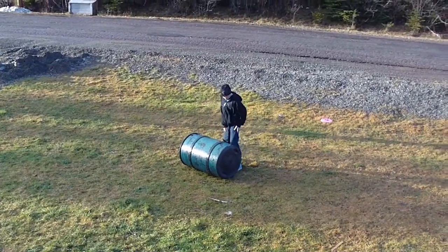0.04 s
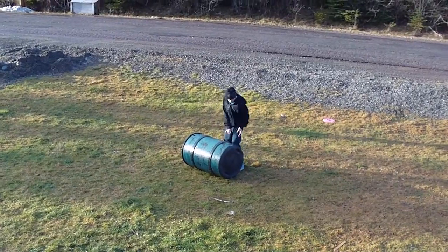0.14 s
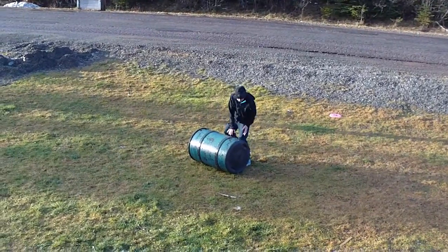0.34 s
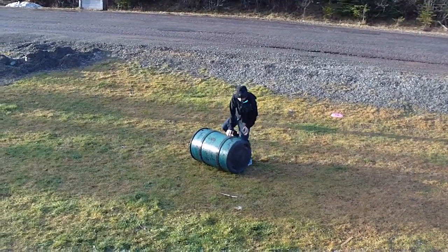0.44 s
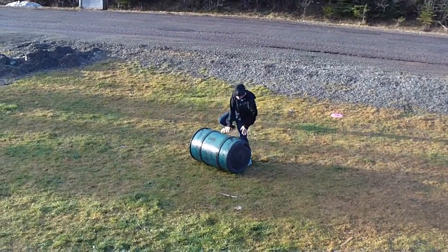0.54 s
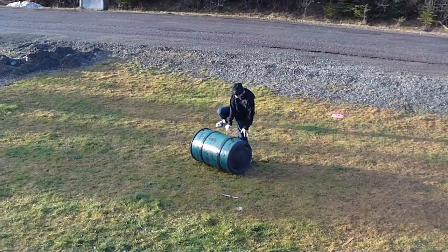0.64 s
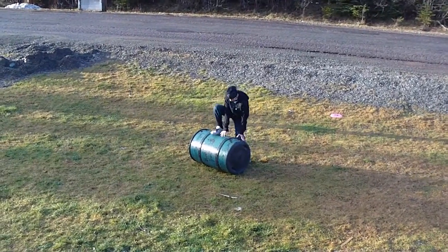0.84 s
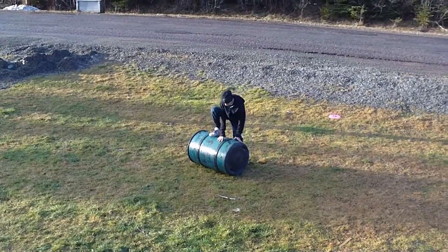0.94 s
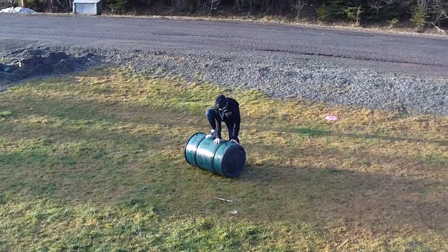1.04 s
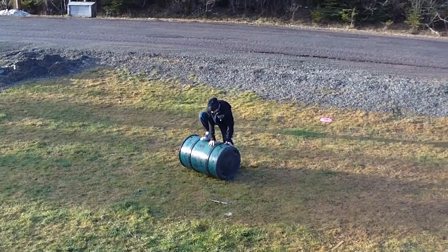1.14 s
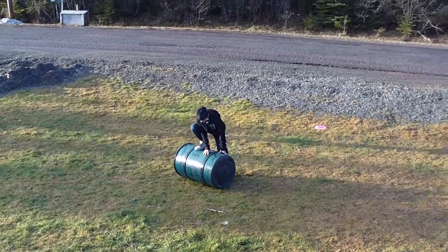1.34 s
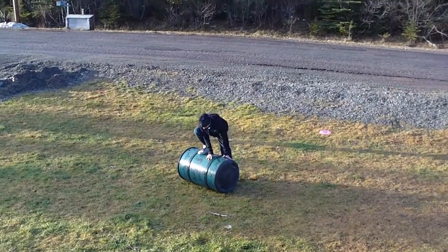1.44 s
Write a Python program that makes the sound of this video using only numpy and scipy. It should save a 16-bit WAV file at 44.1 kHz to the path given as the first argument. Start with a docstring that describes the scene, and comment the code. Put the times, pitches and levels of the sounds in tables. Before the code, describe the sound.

A small close click, then a dull, hollow footstep on a barrel over faint wind.

```python
"""A lawn in light wind: rumble, rush and faint hiss throughout, a few tiny rustling ticks at first.
At 0.24 s something small and hard clicks close to the microphone, rings and rattles for a moment.
At 0.38 s a soft bump sounds the hollow modes of a barrel lying in the grass.
At 0.8 s a foot comes down on it: a slap of the sole and a dull, hollow thump.
One more tiny tick follows as the barrel dies away."""
import sys
import numpy as np
from scipy import signal
from scipy.fft import rfft, irfft, next_fast_len
from scipy.io import wavfile
from scipy.ndimage import map_coordinates

SR = 44100
rng = np.random.default_rng(int(sys.argv[2]) if len(sys.argv) > 2 else 0)


def output_pcm(signal):
    """Save a mono or channel-first signal as 16-bit PCM at the path in sys.argv[1].

    Samples are clipped to [-1, 1] before scaling.
    """
    pcm = np.clip(np.atleast_2d(signal).T, -1, 1) * 32767
    wavfile.write(sys.argv[1], SR, np.round(pcm).astype(np.int16))


N = 66150

# wind spectra (frequency [Hz], relative density [dB])
RUMBLE_SPECTRUM = [(12, -5.5), (28, 1.5), (70, -5), (110, -8), (200, -14.5), (400, -40.5), (1500, -67)]
RUSH_SPECTRUM = [(100, -20), (250, -8.5), (380, -3), (500, -1), (700, -5), (900, -2.5), (1200, -12.5),
                 (1750, -14), (2200, -27.5), (4000, -29), (16000, -51)]
HISS_SPECTRUM = [(500, -24), (2000, 0), (3200, -1), (4600, -0.5), (6000, -3.5), (7200, -3.5), (8300, 2),
                 (10000, -4.5), (12500, -12.5), (15000, -26)]
# wind envelopes (time [s], level [dB])
RUSH_ENVELOPE = [(0, -52), (.08, -52), (.2, -58), (.32, -56), (.41, -50.5), (.438, -47), (.49, -50.5),
                 (.57, -51.5), (.69, -51.5), (.79, -48), (.9, -42.5), (.96, -47), (1.02, -45),
                 (1.07, -44.5), (1.115, -42), (1.17, -51), (1.33, -53), (1.5, -49.5)]
HISS_ENVELOPE = [(0, -70), (.06, -63), (.1, -61), (.19, -63.5), (.23, -54), (.28, -58), (.31, -64),
                 (.42, -61), (.49, -59), (.55, -66), (.7, -63.5), (.85, -63.5), (1.06, -63), (1.2, -55.5),
                 (1.31, -62), (1.42, -61), (1.5, -54)]
# rustling ticks (time [s], level [dB])
RUSTLE_TICKS = [(.061, -50), (.085, -50), (0.103, -45), (1.194, -47)]
# contacts of the small hard part (time [s], gain [dB], low-pass cut-off [Hz])
PART_CONTACTS = [(0.2184, -1.5, 760), (.2252, -27, 2250), (.2362, -13, 746), (0.2422, 3, 18000),
                 (0.2455, -13.5, 6000), (.2655, -23, 1500), (0.2717, -9.5, 810), (.2777, -24.5, 2600)]
# modes of the small hard part (frequency [Hz], level [dB], t60 [s])
PART_MODES = [(140, -38, 0.025), (401, -32.5, 0.056), (510, -24, 0.013), (795, -22.5, 0.03),
              (1293, -21.5, 0.027), (1514, -20.5, 0.018), (1915, -16.5, 0.019), (2825, -12.5, 0.0076),
              (3234, -19, 0.0094), (4076, -16.5, 0.012), (4500, -17, 0.007), (5040, -13.5, 0.0098),
              (5600, -16.5, 0.0077), (7530, -9, 0.0039), (8590, -21.5, 0.0096), (14900, -36, .005)]
# modes of the barrel (frequency [Hz], level [dB], t60 [s])
HOLLOW_MODES = [(46.3, -30, 0.36), (71.9, -28.5, 0.36), (109, -29.5, 0.26), (152.6, -33.5, 0.54),
                (166.4, -37, 0.41), (230, -35.5, 0.16), (334, -25, 0.11), (389, -35.5, 0.18),
                (423.7, -37.5, 0.44), (448, -37.5, 0.26), (491, -35, 0.22), (677, -34.5, 0.097),
                (928, -36, 0.098)]
# noise bursts of the blow: push, shell, slap, scuff, tick of the sole
# (low edge [Hz], high edge [Hz], level [dB], attack [s], t60 [s])
FOOT_BURSTS = [(55, 234, -43, 0.0025, 0.098), (246, 1090, -29, 0.0056, 0.15),
               (930, 1670, -29.5, 0.0018, 0.038), (2370, 4900, -43, 0.00073, 0.032),
               (6700, 10400, -47, .0006, 0.032)]

SELF_NOISE_DB, BAND_LIMIT_HZ = -68, 15700
RUMBLE_START_DB, RUMBLE_RISE_DB_PER_S = -55, 4
CLICK_ATTACK_S, CLICK_SCATTER_DB = 0.0005, 1
RATTLE_START_S, RATTLE_END_S, RATTLE_T60_S = 0.25, 0.2826, 0.031
RATTLE_DB, RATTLE_CUTOFF_HZ = -42.5, 1080
BARREL_LAG_CYCLES, BARREL_ATTACK_CYCLES, BARREL_SCATTER_DB = 0.43, 1, 0.5
BUMP_S, BUMP_GAIN_DB, THUMP_S = 0.38, -24, 0.7993


def amp(db):
    """Decibels to gain."""
    return 10 ** (np.asarray(db) / 20)


def unit(x):
    """Scaled to rms 1."""
    return x / np.sqrt(np.mean(x ** 2) + 1e-20)


def since(start_s):
    """Seconds since start_s, zero before."""
    return np.maximum(np.arange(N) / SR - start_s, 0)


def curve(points):
    """(time [s], value) points joined by lines."""
    return np.interp(since(0), *np.transpose(points))


def wobble(knots_per_s):
    """Smooth random curve."""
    return map_coordinates(rng.standard_normal(400), [since(0) * knots_per_s], mode="wrap")


def filtered(x, response):
    """x shaped by a frequency response."""
    size = next_fast_len(N + SR // 2)
    return irfft(rfft(x, size) * response(np.fft.rfftfreq(size, 1 / SR)), size)[:N]


def noise(spectrum):
    """Noise of rms 1, coloured by (frequency [Hz], density [dB]) points."""
    hz, db = np.transpose(spectrum)
    white = rng.standard_normal(N)
    return unit(filtered(white, lambda f: amp(np.interp(np.log(f + 1), np.log(hz), db))))


def band(low_hz, high_hz):
    """Band noise of rms 1."""
    sos = signal.butter(4, [low_hz, high_hz], btype="band", fs=SR, output="sos")
    return unit(signal.sosfilt(sos, rng.standard_normal(N)))


def soften(x, cutoff_hz):
    """Two-pole low-pass: a softer contact has less treble."""
    return filtered(x, lambda f: 1 / (1 + 1j * np.sqrt(2) * f / cutoff_hz - (f / cutoff_hz) ** 2))


def strike(t, attack_s, t60_s):
    """Quick rise, exponential decay."""
    return (1 - np.exp(-t / attack_s)) * amp(-60 * t / t60_s)


def wind():
    """Rumble on the microphone, midrange rush and faint hiss, each slightly unsteady."""
    rumble_db = RUMBLE_START_DB + RUMBLE_RISE_DB_PER_S * since(0)
    rumble = amp(rumble_db + 0.94 * wobble(9.62)) * noise(RUMBLE_SPECTRUM)
    rush = amp(curve(RUSH_ENVELOPE) + 0.77 * wobble(39.82)) * noise(RUSH_SPECTRUM)
    hiss = amp(curve(HISS_ENVELOPE) + 1.04 * wobble(70.8)) * noise(HISS_SPECTRUM)
    return rumble + rush + hiss


def rustle():
    """Tiny dry ticks: short bursts of treble noise."""
    envelope = sum(amp(db) * strike(since(start_s), attack_s=0.0002, t60_s=0.019)
                   for start_s, db in RUSTLE_TICKS)
    return envelope * band(low_hz=5600, high_hz=10600)


def part_ring(start_s):
    """One contact of the small part: modes of alternating sign plus a noisy crack."""
    t = since(start_s)
    ring = np.zeros(N)
    for k, (hz, db, t60_s) in enumerate(PART_MODES):
        gain = (-1) ** k * amp(db + CLICK_SCATTER_DB * rng.standard_normal())
        ring += gain * strike(t, CLICK_ATTACK_S, t60_s) * np.sin(2 * np.pi * hz * t)
    crack = amp(-24.5) * strike(t, CLICK_ATTACK_S, t60_s=0.0086) * band(low_hz=6600, high_hz=10900)
    return ring + crack


def click():
    """Soft touches around one hard snap, all in the same modes."""
    return sum(amp(db) * soften(part_ring(start_s), cutoff_hz)
               for start_s, db, cutoff_hz in PART_CONTACTS)


def rattle():
    """The loose part chatters briefly: noise drives its ring."""
    driven = signal.fftconvolve(rng.standard_normal(N), part_ring(0))[:N]
    chatter = unit(soften(driven, RATTLE_CUTOFF_HZ))
    envelope = (since(RATTLE_START_S) > 0) * amp(-60 * since(RATTLE_END_S) / RATTLE_T60_S)
    return amp(RATTLE_DB) * envelope * chatter


def barrel_ring(start_s):
    """Hollow modes of alternating sign; lower modes build up later."""
    ring = np.zeros(N)
    for k, (hz, db, t60_s) in enumerate(HOLLOW_MODES):
        t = since(start_s + BARREL_LAG_CYCLES / hz)
        gain = (-1) ** k * amp(db + BARREL_SCATTER_DB * rng.standard_normal())
        ring += gain * strike(t, BARREL_ATTACK_CYCLES / hz, t60_s) * np.sin(2 * np.pi * hz * t)
    return ring


def bump():
    """A soft contact rings the barrel, quiet and dull."""
    return amp(BUMP_GAIN_DB) * soften(barrel_ring(BUMP_S), cutoff_hz=900)


def thump():
    """The foot lands: noise bursts of the blow plus the barrel's full ring."""
    blow = sum(amp(db) * strike(since(THUMP_S), attack_s, t60_s) * band(low_hz, high_hz)
               for low_hz, high_hz, db, attack_s, t60_s in FOOT_BURSTS)
    return blow + barrel_ring(THUMP_S)


def scene():
    """All sources at one microphone, over its steady self-noise."""
    self_noise = amp(SELF_NOISE_DB) * rng.standard_normal(N)
    return (self_noise + wind() + rustle() + click() + rattle() + bump() + thump())[None]


def record(dry):
    """Brick-wall low-pass at the band limit."""
    return np.array([filtered(x, lambda hz: hz < BAND_LIMIT_HZ) for x in dry])


dry = scene()
out = record(dry)
output_pcm(out)
```